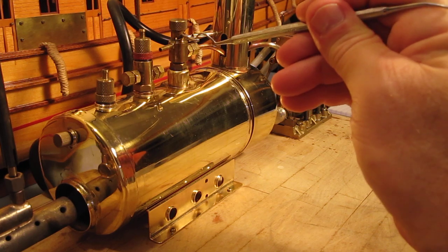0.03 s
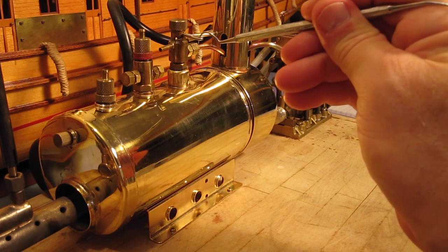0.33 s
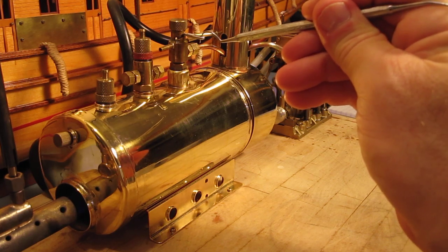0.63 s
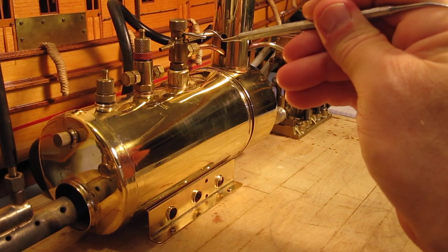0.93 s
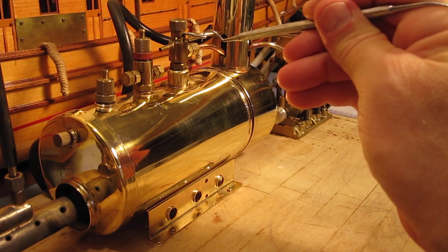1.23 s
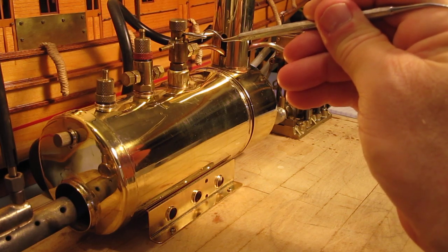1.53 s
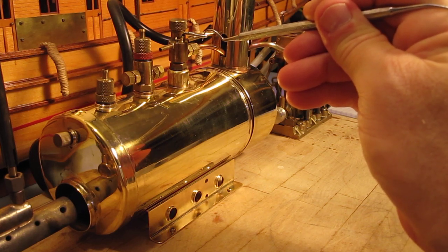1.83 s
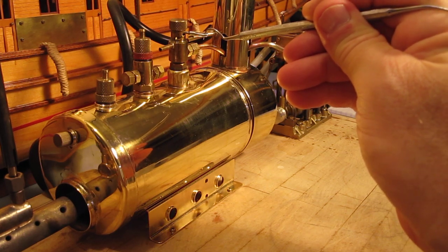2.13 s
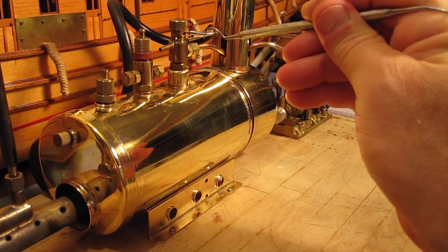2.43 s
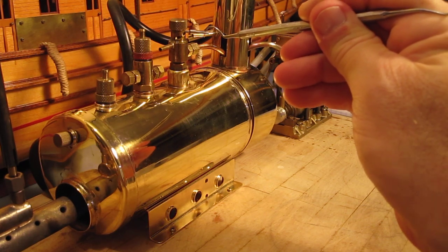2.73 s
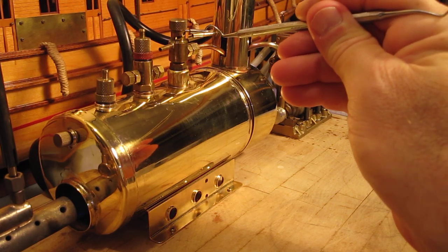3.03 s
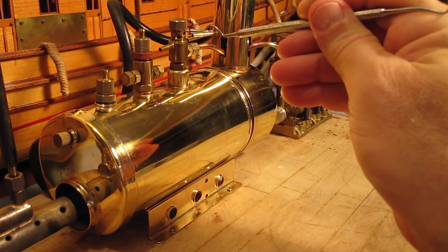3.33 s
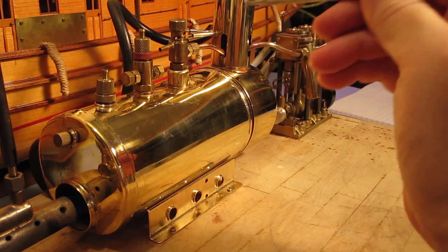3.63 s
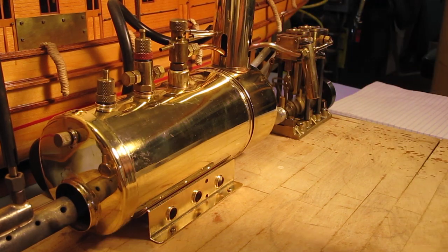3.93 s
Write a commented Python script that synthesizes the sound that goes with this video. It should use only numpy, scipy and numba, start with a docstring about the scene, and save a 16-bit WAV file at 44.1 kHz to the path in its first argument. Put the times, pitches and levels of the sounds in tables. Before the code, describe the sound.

A loud steam hiss dominates, heard close in a small workshop. At first a small steam engine chuffs and rattles very fast over a burner's roar. At about 0.9 seconds a boiler valve spits open into a bright, sizzling jet. The engine continues underneath, quieter and slightly slower, with a faint drone. The hiss holds until the end at 4 seconds, shifting in tone around 3.5 seconds.

```python
"""A small steam engine chuffs fast on a workbench: two exhaust beats a turn ring the chimney,
the linkage rattles and a gland spits once a turn, over a burner's roar and a thin steam hiss.
Just before one second a valve on the brass boiler is opened: it sputters, then vents a loud jet.
The engine slows a little, the bench starts to drone, and the jet makes a gain control duck the mix.
Near the end the hand beside the jet draws away."""
import sys
import numpy as np
from scipy import signal
from scipy.fft import rfft, irfft
from scipy.io import wavfile
from scipy.ndimage import uniform_filter1d, map_coordinates
from numba import njit

SR = 44100
rng = np.random.default_rng(int(sys.argv[2]) if len(sys.argv) > 2 else 0)


def generate_wav(sig):
    """Save sig (samples, or channels by samples) to the path in sys.argv[1] as 16-bit PCM at SR."""
    pcm = np.round(np.clip(np.atleast_2d(sig).T, -1, 1) * 32767).astype(np.int16)
    wavfile.write(sys.argv[1], SR, pcm)


N = 176400
T = np.arange(N) / SR
SETTLE_START_S, SETTLE_LENGTH_S = 1.08, .35  # the limp and the drone fade in as the engine slows

# Loose knocks of the linkage (lag/turns, level/dB against the strong beat)
LINKAGE_KNOCKS = [(.115, -8), (.235, -6.5), (.405, -6), (0.452, -5), (.62, -8.5), (.71, -8)]
# EQ of the beats and knocks (f/Hz, level/dB)
ENGINE_EQ = [(30, -25), (110, -18), (165, -3.5), (300, -13), (430, 3), (500, -11), (600, 4), (1100, 0.5),
             (1600, 2.5), (2200, 0), (2700, -2.5), (3300, -14), (4500, -10), (8000, -56), (16000, -57)]
# Engine fader (t/s, level/dB)
ENGINE_FADER = [(0, -22), (.3, -24), (.65, -22.5), (4, -24.5)]
def engine(turns):
    """A strong and a weak exhaust beat each turn ring the chimney; steam puffs, the linkage rattles."""
    beats = strokes(turns, 0, jitter_s=.00003, scatter_db=.5) + undb(-6) * strokes(turns, .655)
    rattle = sum(undb(db) * strokes(turns, lag) for lag, db in LINKAGE_KNOCKS)
    puff_age = (turns - .09) % 1  # in turns
    puff = unit(rng.standard_normal(N) * np.exp(-puff_age / .17))
    exhaust = beats + undb(-8.5) * np.std(beats) * puff
    direct = room(undb(-2.5) * exhaust + rattle, wet_db=-8)
    body = -unit(colour(direct + chimney(exhaust), ENGINE_EQ))
    return (body + chuff(turns)) * undb(curve(ENGINE_FADER))


# Resonances of chimney and boiler (f/Hz, t60/s, level/dB)
CHIMNEY_MODES = [(190, 0.13, 2.5), (329, 0.18, 13), (417.7, 0.22, 8), (564, 0.58, 14), (625.8, 0.26, 6.5),
                 (646, 0.28, -0.5), (717, 0.3, 13.5), (792, 0.25, 5), (818, 0.4, 13.5), (1076, 0.24, 18),
                 (1174, 0.18, 11), (1262, 0.042, 8.5), (1504, 0.063, 7.5)]
# Early reflections off bench and wall (delay/s, level/dB)
REFLECTIONS = [(.0036, -5.5), (.0045, -14.5), (.0078, -11.5), (.0088, -7), (0.0175, -7)]
def chimney(exhaust):
    """The exhaust rings chimney and boiler, and slaps back off bench and wall."""
    delay, echo_db = np.array(REFLECTIONS).T
    response = clicks(delay, undb(echo_db))
    for hz, t60, db in CHIMNEY_MODES:
        decay = np.log(1000) / t60
        response += undb(db) * 2 * decay / SR * np.exp(-decay * T) * np.cos(2 * np.pi * hz * T)
    return ring(exhaust, response)


def chuff(turns):
    """A short falling chimney note after each strong beat; it limps loud-soft once the engine slows."""
    hz = np.geomspace(1350, 540, int(.013 * SR))
    note = np.hanning(len(hz)) * np.sin(2 * np.pi * np.cumsum(hz) / SR)
    odd_turn = np.floor(turns) % 2
    limp_db = -4.5 * (odd_turn - .5) * ramp(SETTLE_START_S, SETTLE_LENGTH_S)
    triggers = strokes(turns, .07, jitter_s=.00015) * undb(limp_db)
    return unit(ring(triggers, note)) * undb(-12)


# Tone of the jet beside the hand (f/Hz, level/dB)
JET_HAND_EQ = [(500, -28), (2500, -20), (3800, -13), (4400, -15), (5300, -4.5), (5620, -15), (5780, -5),
               (5900, -13), (6330, 0), (6520, -3), (6650, -12), (6770, -4), (6900, -12), (7020, -8),
               (7150, 4), (7450, -2), (7650, 2.5), (7760, -2), (7870, 1), (7990, -11), (8200, -7),
               (8510, 1), (8740, -6), (9100, 1.5), (9380, -3), (9520, -1), (9950, -6), (10130, -12),
               (10280, -7), (10420, -12), (10620, -2), (11050, -8.5), (11500, -4), (12200, -4),
               (12750, -16), (13050, -11), (13500, -19), (14200, -21), (14700, -14), (15400, -14),
               (16000, -20)]
# Tone of the jet in free air (f/Hz, level/dB)
JET_FREE_EQ = [(500, -21), (2500, -13.5), (5200, -0.5), (5650, -2), (6350, 5.5), (6900, -3.5), (7600, 4.5),
               (8000, -7), (8550, 4.5), (9300, -1.5), (10200, -5), (11700, -5), (12600, -7), (13000, -9),
               (13900, -13), (15500, -16)]
# High-shelf ride on the jet (t/s, level/dB)
JET_SHELF = [(1, 1.5), (1.5, 0.5), (1.65, 2), (2.4, 1.5), (3.1, 0.5), (3.47, -4), (3.58, -6), (3.75, -1),
             (4, -5)]
# Fader of the steam jet and its sizzle (t/s, level/dB)
JET_FADER = [(.9, -29.5), (.955, -13.5), (1.08, -14.5), (1.17, -15.5), (1.42, -16), (1.56, -13),
             (1.67, -14.5), (1.76, -15), (1.94, -16), (2.05, -9.5), (2.16, -11), (2.25, -12), (2.7, -12.5),
             (2.95, -15.5), (3.2, -15), (3.45, -15.5), (3.56, -13), (3.72, -15), (4, -16.5)]
def jet(valve):
    """Fluttering steam hiss; as the hand withdraws, the tone opens and its echo combs downward."""
    hand_leaves_s = 3.48
    away = ramp(hand_leaves_s, .3)
    hiss = noise(JET_HAND_EQ) * np.sqrt(1 - away) + noise(JET_FREE_EQ) * np.sqrt(away)
    hiss = unit(room(hiss, wet_db=-8.5))
    delay_s = .0006 + .0008 * (T - hand_leaves_s)
    hand_echo = map_coordinates(highpass(hiss, 9000), [(T - delay_s) * SR], mode="mirror")
    hiss += away * undb(-8) * hand_echo
    hiss += highpass(hiss, 12000) * (undb(curve(JET_SHELF)) - 1)
    flutter_db = .67 * wobble(38) + .65 * wobble(400)
    return hiss * valve * undb(curve(JET_FADER) + flutter_db)


# Tone of water in the valve (f/Hz, level/dB)
WATER_EQ = [(800, -28), (2600, -18), (3300, -4), (3900, 0), (4300, -5), (4750, -.5), (5200, 1), (5650, -9),
            (6350, -4.5), (8000, -16), (15000, -30)]
# Sizzle ride (t/s, level/dB against the jet fader)
SIZZLE_FADER = [(.885, -8), (.906, 1), (.945, -1), (.965, -6), (1.08, -6.5), (1.2, -4.5), (1.43, -2.5),
                (1.51, -9), (1.7, -7), (1.78, -9), (1.87, -4.5), (1.98, -5.5), (2.1, -8.5), (2.41, -8),
                (2.47, -3.5), (2.55, -5.5), (2.71, -14.5), (2.82, -7), (2.88, -12), (2.97, -4.5),
                (3.47, -3.5), (3.55, -9), (4, -7)]
# Loud single spits (t/s, level/dB)
WATER_SPITS = [(.9046, -9), (0.925, -13), (.931, -6), (0.9423, -4), (.9462, 2), (0.9526, 2), (0.971, 1),
               (1.0298, 3), (1.249, -6)]
def water():
    """Droplets tear in the valve: a sizzle with fine crackle, and a few sharp spits as it opens."""
    drops_per_s = 400
    position, size = rng.random((int(drops_per_s * N / SR), 2)).T
    drop_db = np.minimum(-1.5 * np.log(1 - size), 14)  # many small, a few large
    crackle = unit(clicks(position * N / SR, undb(drop_db)))
    sizzle = unit(colour(rng.standard_normal(N) + undb(-6.5) * crackle, WATER_EQ))
    sizzle *= undb(curve(JET_FADER) + curve(SIZZLE_FADER) + .87 * wobble(39))
    sizzle *= T > SIZZLE_FADER[0][0]
    spit_s, spit_db = np.array(WATER_SPITS).T
    click_peak = np.abs(colour(clicks(np.zeros(1), np.ones(1)), WATER_EQ)).max()
    spits = colour(clicks(spit_s, undb(spit_db)), WATER_EQ) / click_peak
    return sizzle + room(spits, wet_db=-15)


# Tone of the barely open valve (f/Hz, level/dB)
SEAT_EQ = [(3000, -20), (8000, -12), (9300, 0), (10200, -7), (10650, 0), (11100, -6), (12100, 1),
           (13000, -7), (13500, -16), (15500, -28)]
def valve_seat(valve):
    """While the valve is only part open, steam squeezes through as a thin high hiss."""
    return noise(SEAT_EQ) * undb(-24.5) * 2 * np.sqrt(valve) * (1 - valve)


# Tone of the gland leak (f/Hz, level/dB)
GLAND_EQ = [(1500, -39), (3950, 3), (4700, -3), (5000, -10), (5280, -2), (5600, -10), (8000, -7),
            (9150, -4), (9650, 3), (10000, -4), (10300, -4), (10650, 5.5), (11050, 0), (11450, -9),
            (12150, -7), (12700, -13), (13500, -11), (15500, -21)]
def gland(turns):
    """A bright tick of leaking steam just after each strong beat, never twice the same."""
    rise_s, decay_s = .002, .0032
    age_s = (turns - .045 + .008 * wobble(30)) % 1 / curve(SHAFT_SPEED)
    envelope = np.minimum(age_s / rise_s, 1) * np.exp(-age_s / decay_s) * undb(1.1 * wobble(38))
    ticks = colour(rng.standard_normal(N) * envelope, GLAND_EQ)
    return unit(room(ticks, wet_db=-11)) * undb(-34)


# Partials of the bench drone (multiple of shaft speed)
BENCH_ORDERS = [6, 7, 8, 10, 16, 22]
# Balance of those partials (level/dB)
BENCH_LEVELS = [-37.5, -55, -47, -43, -47.5, -49]
def bench(turns):
    """The bench drones roughly at multiples of the shaft speed once the engine has slowed."""
    drone = np.zeros(N)
    for order, db in zip(BENCH_ORDERS, BENCH_LEVELS):
        partial = unit(np.sin(2 * np.pi * (order * turns + rng.random())))
        drone += partial * undb(db + .5 * wobble(4.2) + wobble(43))
    return drone * ramp(SETTLE_START_S, SETTLE_LENGTH_S)


# Tone of the bed: broad burner roar, with valve resonances as treble peaks (f/Hz, level/dB)
BED_EQ = [(25, -30), (70, -18), (120, -21), (180, -2), (500, -10), (800, -2.5), (2000, -4), (3200, -3.5),
          (3650, -9), (3950, -1.5), (5000, -8), (5280, -8), (5600, -9.5), (6400, -8.5), (6800, -5.5),
          (7500, -11.5), (9200, -12), (9650, -10), (10200, -15), (10650, -5), (11400, -19), (13000, -18),
          (15500, -35)]
def boiler_bed():
    """Steady background: burner roar plus a thin steam hiss ringing at the valve's resonances."""
    return noise(BED_EQ) * undb(-28.5 + .5 * wobble(50))


def room(x, wet_db, t60_s=.2):
    """Add the workshop's short diffuse reverb."""
    t = T[:SR // 2]
    onset = np.clip(t / .0026 - .5, 0, 1)
    tail = rng.standard_normal(len(t)) * np.exp(-np.log(1000) * t / t60_s) * onset
    return x + undb(wet_db) * ring(x, tail / np.linalg.norm(tail))


def strokes(turns, lag_turns, jitter_s=.0003, scatter_db=1.5):
    """One impulse a turn, each a little off in time and strength."""
    count = np.arange(int(turns[-1]) + 1)
    late, size = rng.standard_normal((len(count), 2)).T
    due_s = np.interp(count + lag_turns, turns, T, right=T[-1] + 1)
    return clicks(due_s + jitter_s * late, undb(scatter_db * size))


def undb(db):
    """Decibels to gain."""
    return 10 ** (np.asarray(db) / 20)


def unit(x):
    """Scale to rms 1."""
    return x / np.sqrt(np.mean(x ** 2))


def curve(rows):
    """Automation: straight lines through (t/s, value) rows."""
    return np.interp(T, *np.array(rows).T)


def ramp(start_s, length_s):
    """Rise from 0 to 1."""
    return np.clip((T - start_s) / length_s, 0, 1)


def wobble(rate_hz):
    """Smooth random modulation of rms 1."""
    width = int(SR / rate_hz)
    return unit(uniform_filter1d(uniform_filter1d(rng.standard_normal(N), width), width))


def ring(x, response):
    """Pass a sound through an impulse response."""
    return signal.fftconvolve(x, response)[:N]


def colour(x, eq, size=4096):
    """Minimum-phase EQ through (f/Hz, level/dB) points."""
    hz, db = np.array(eq).T
    bins = np.maximum(np.arange(size // 2 + 1) * SR / size, 1)
    gain = undb(np.interp(np.log(bins), np.log(hz), db))
    cepstrum = irfft(np.log(gain))
    cepstrum[1:size // 2] *= 2
    cepstrum[size // 2 + 1:] = 0
    return ring(x, irfft(np.exp(rfft(cepstrum))))


def noise(eq):
    """Coloured noise of rms 1."""
    return unit(colour(rng.standard_normal(N), eq))


def clicks(times, sizes):
    """Single impulses at the given times."""
    return np.bincount(np.clip(times * SR, 0, N).astype(int), sizes, N + 1)[:N]


def highpass(x, hz):
    """Zero-phase low cut."""
    return signal.sosfiltfilt(signal.butter(4, hz, "highpass", fs=SR, output="sos"), x)


@njit
def follow(power, attack_s, release_s):
    """Envelope follower: quick up, slower down."""
    envelope, held = np.empty(len(power)), 0.
    for i in range(len(power)):
        held += (power[i] - held) / (SR * (attack_s if power[i] > held else release_s))
        envelope[i] = held
    return envelope


# Engine tempo (t/s, speed/turns per second)
SHAFT_SPEED = [(0.0, 29.517), (0.45, 29.69), (0.9, 30.266), (1.15, 29.447), (1.45, 28.827), (2.0, 28.544),
               (2.4, 28.453), (2.8, 28.495), (3.2, 28.498), (3.6, 28.468), (4.0, 28.722)]
def scene():
    """The shaft clocks the engine layers, the valve lets in the steam; mixed in mono."""
    turns = np.cumsum(curve(SHAFT_SPEED)) / SR - .294 + .0035 * wobble(6)  # strong beats on whole turns
    valve = ramp(start_s=.888, length_s=.085)
    machine = engine(turns) + gland(turns) + bench(turns) + boiler_bed()
    mono = machine + valve_seat(valve) + jet(valve) + water()
    return np.array([mono, mono])


def record(dry):
    """Gain control keyed from the treble lets the jet duck the engine; a steep high cut follows."""
    threshold_db, ratio = -23, 25
    sidechain = uniform_filter1d(highpass(dry[0], 2500) ** 2, int(.006 * SR))
    level = np.sqrt(np.abs(follow(sidechain, attack_s=.02, release_s=.04)))
    gain = np.maximum(level / undb(threshold_db), 1) ** (1 / ratio - 1)
    high_cut = signal.ellip(12, .1, 90, 15700, fs=SR, output="sos")
    return signal.sosfilt(high_cut, dry * gain)


dry = scene()
out = record(dry)
generate_wav(out)
```